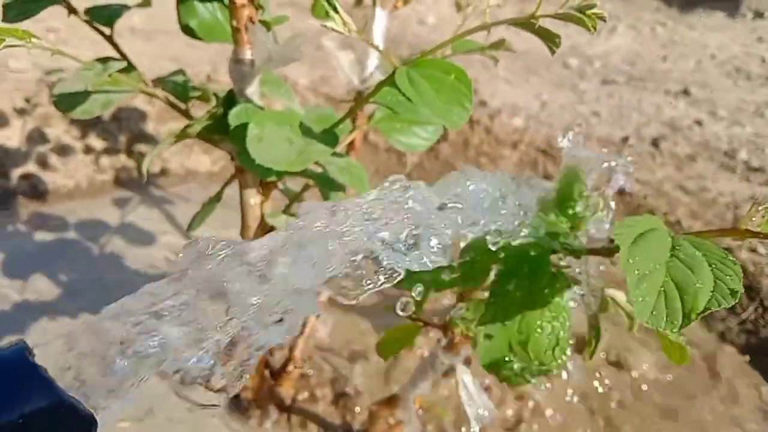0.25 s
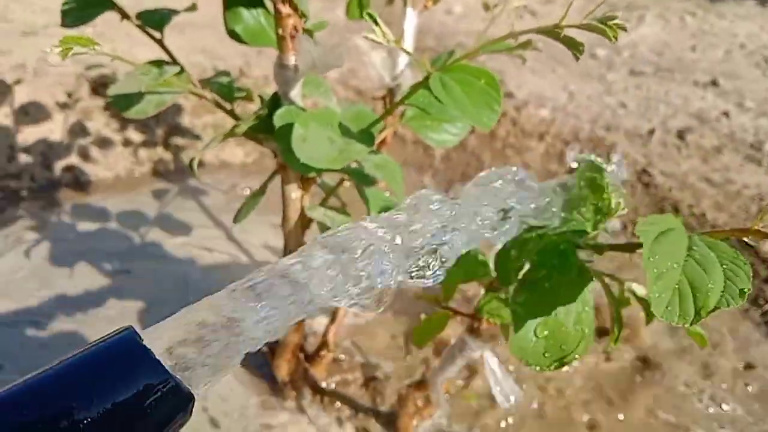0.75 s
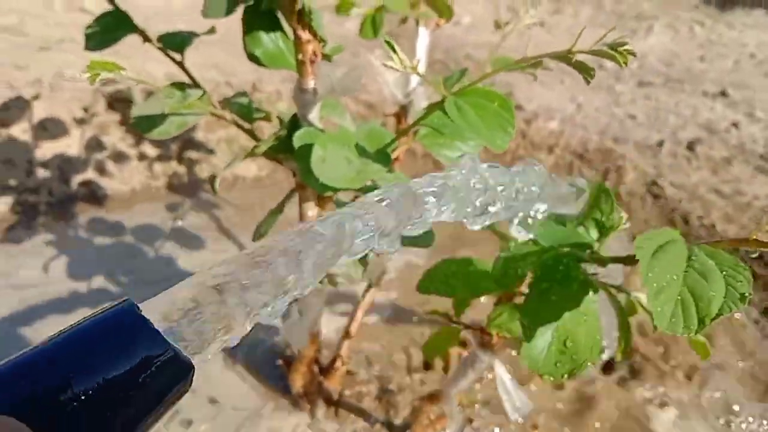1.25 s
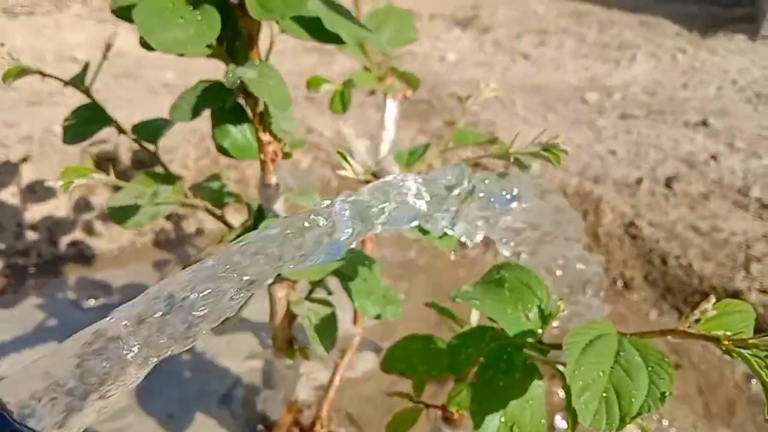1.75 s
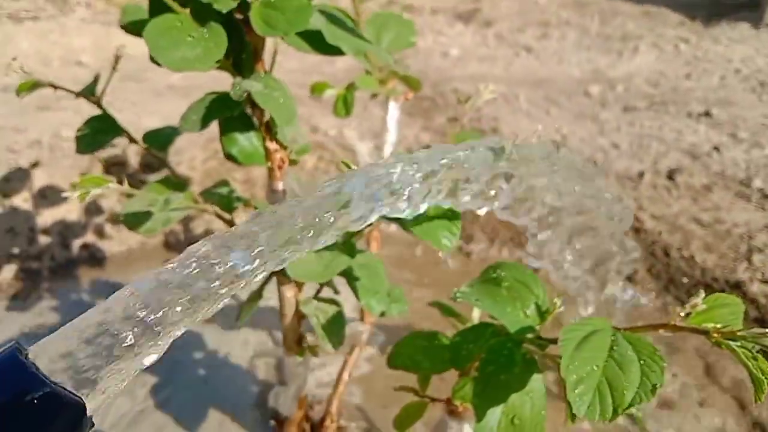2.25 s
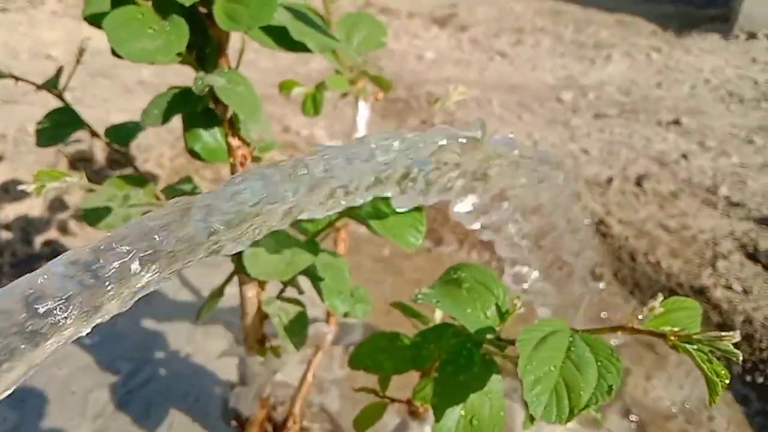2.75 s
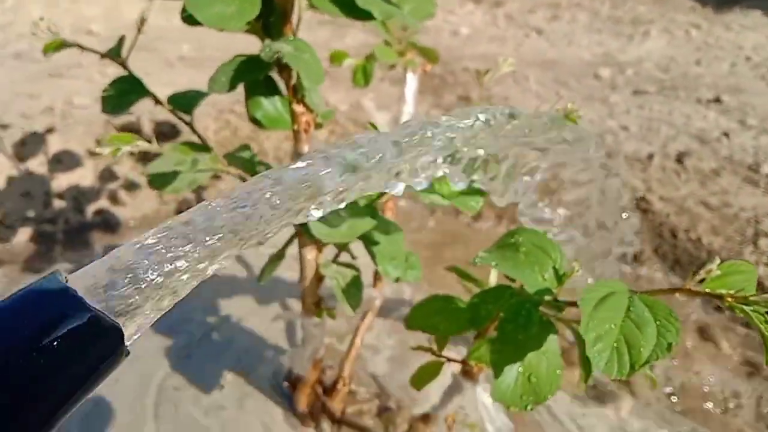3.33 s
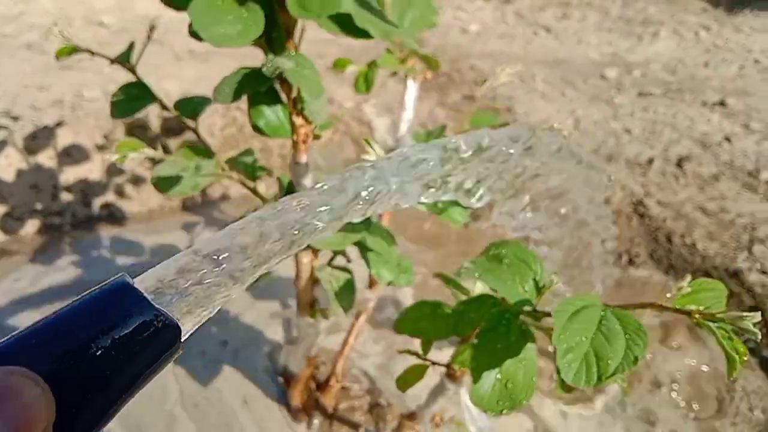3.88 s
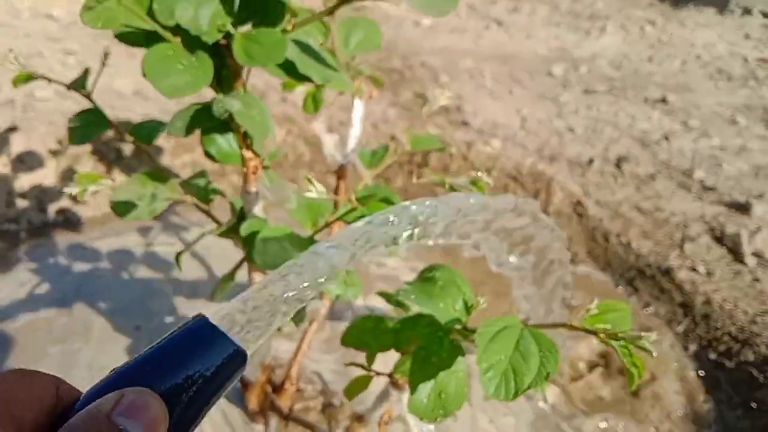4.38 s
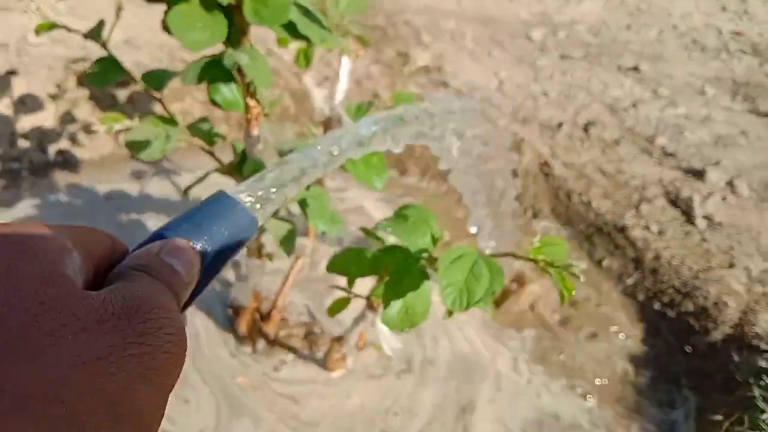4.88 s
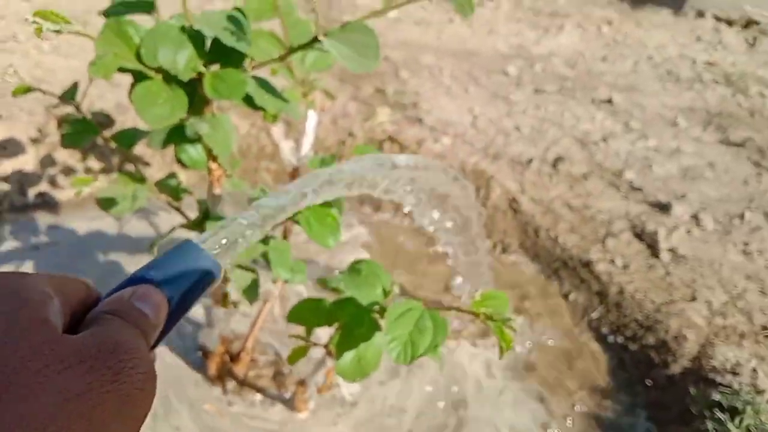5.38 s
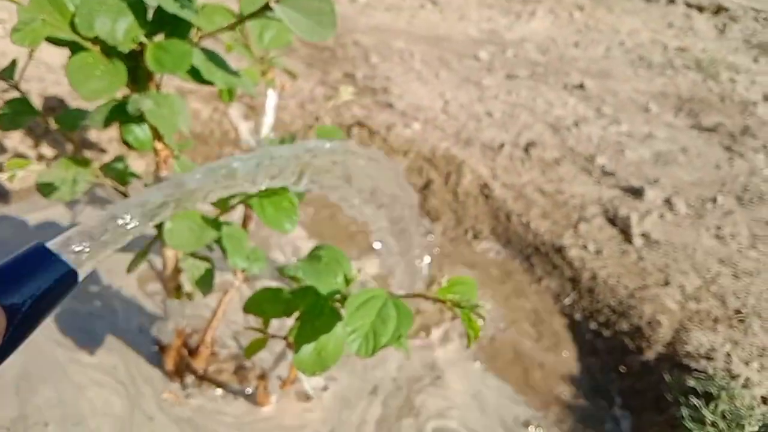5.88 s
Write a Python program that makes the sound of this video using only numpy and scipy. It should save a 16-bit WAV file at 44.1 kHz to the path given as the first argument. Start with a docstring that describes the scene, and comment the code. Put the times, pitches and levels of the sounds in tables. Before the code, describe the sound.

Very close outdoors, a heavy hose jet batters sapling leaves with bright, crackling splatter for about a second and a half. It then drops somewhat quieter and deeper into a muddy puddle, gurgling continuously, with sharp wet slaps, low thumps and rising bubble blips. Near the end the jet is drawn back and the low gurgle eases slightly. No echoing space, only water.

```python
"""First a thick jet of water tears noisily on the leaves of a sapling, outdoors and very close.
The jet from a hand-held hose then arcs over them into a muddy puddle, and at last is drawn back a little.
A dense splatter of drop ticks and tiny bubble rings runs throughout.
Lumps of water slap down as clusters of clicks and thump the mud with short low rings.
They trap bubbles, each a ring that swells, dies away and rises in pitch."""
import sys
import numpy as np
from scipy import signal
from scipy.fft import rfft, irfft
from scipy.io import wavfile
from scipy.ndimage import uniform_filter1d, minimum_filter1d, map_coordinates

SR = 44100
rng = np.random.default_rng(int(sys.argv[2]) if len(sys.argv) > 2 else 0)


def file_out(sig):
    """Save sig as 16-bit WAV at sys.argv[1]."""
    # one column per channel
    cols = np.atleast_2d(sig).T
    # limit, then scale
    lim = np.clip(cols, -1, 1)
    pcm = np.round(lim * 32767).astype(np.int16)
    wavfile.write(sys.argv[1], SR, pcm)


N = 269451


def gain_of(db):
    """Turns decibels into a multiplier."""
    return 10 ** (np.asarray(db) / 20)


def evened(x):
    """Scales a sound to an average strength (rms) of 1."""
    return x / np.sqrt(np.mean(x ** 2) + 1e-20)


def follow(rows, column=1):
    """Joins a table's points with straight lines, giving one value per sample."""
    rows = np.asarray(rows)
    return np.interp(np.arange(N) / SR, rows[:, 0], rows[:, column])


def add(mix, start_s, sound):
    """Mixes a sound in at a given time, or at the very start if that time is negative."""
    part = mix[max(round(start_s * SR), 0):][:len(sound)]
    part += sound[:len(part)]


def band(x, lo_hz, hi_hz, order=2):
    """Keeps the sound between two frequencies, without looking ahead in time."""
    edges_hz = [lo_hz, min(hi_hz, SR / 2 - 1)]
    return signal.sosfilt(signal.butter(order, edges_hz, "band", fs=SR, output="sos"), x)


def below(x, hz):
    """The part of a sound under a frequency, not delayed."""
    return signal.sosfiltfilt(signal.butter(3, hz, fs=SR, output="sos"), x)


def colour(x, points, size=4096):
    """Gives a sound a tone colour without looking ahead, so that clicks keep their sharp front."""
    hz, db = np.transpose(points)
    grid_hz = abs(np.fft.fftfreq(size, 1 / SR))
    log_gain = np.log(gain_of(np.interp(np.log(grid_hz + 1), np.log(hz), db)))
    taps = np.fft.ifft(np.exp(np.conj(signal.hilbert(log_gain)))).real  # minimum phase
    return signal.oaconvolve(x, taps[:size // 2])[:len(x)]


def wander(slow_hz, fast_hz):
    """Random drift of rms 1, mostly between two rates."""
    hz = np.fft.rfftfreq(N, 1 / SR)
    shape = hz / (hz + slow_hz) / np.sqrt(hz + slow_hz) / (1 + (hz / fast_hz) ** 4)
    return evened(irfft(rfft(rng.standard_normal(N)) * shape, N))


def impacts(per_s, spread_db):
    """Random clicks: many small, a few large."""
    size = gain_of(spread_db * np.minimum(rng.exponential(1, N), 4))
    return size * rng.choice([-1, 1], N) * (rng.random(N) < per_s / SR)


def ring(hz, cycles, rise, size=9):
    """A bubble's ring: it swells to full strength over some cycles, then dies as its pitch rises."""
    age = np.arange(int(size * cycles / hz * SR) + 2) * hz / (cycles * SR)  # 1 at the peak
    return age * np.exp(1 - age) * np.sin(2 * np.pi * cycles * age * (1 + rise * age / 2))


def swarm(lo_hz, hi_hz, per_s, spread_db, cycles, rise, clump_db, count=30, size=11):
    """Countless small rings, together flat in spectrum; bubbles of like size are born in clouds."""
    out, pitches = np.zeros(N), np.geomspace(lo_hz, hi_hz, count)
    shares = np.sqrt(pitches) / np.sqrt(pitches).sum()
    places = np.linspace(0, size, count, endpoint=False)
    clouds = [wander(slow_hz=23.2, fast_hz=125) for _ in range(size + 1)]
    for hz, share, place in zip(pitches, shares, places):
        # blend two clouds, so that neighbouring pitches clump alike
        k, turn = int(place), place % 1 * np.pi / 2
        cloud = np.cos(turn) * clouds[k] + np.sin(turn) * clouds[k + 1]
        births = evened(impacts(per_s * share, spread_db) * gain_of(clump_db * cloud))
        out += hz * signal.oaconvolve(births, ring(hz, cycles, rise))[:N]
    return evened(out)


def dips(rows):
    """Smooth bell-shaped changes of level in dB, at every sample."""
    t = np.arange(0, N, 32) / SR
    change_db = sum(db * np.exp(-(2 * (t - s) / length) ** 2) for s, length, db in rows)
    return follow(np.c_[t, change_db])


def arrivals(per_s, level_db, size=120):
    """Loosely paced random events: (start_s, level_db at that moment, three random traits)."""
    times = (np.arange(size) + rng.random(size)) / per_s
    traits = np.clip(rng.standard_normal((size, 3)), -2, 2)
    return [(s, level_db[int(s * SR)], *trait) for s, trait in zip(times, traits) if s * SR < N]


# strength of the splatter over time, before smaller swings: time_s, level_db
FLOW_CURVE = [(0.0, -19.5), (0.35, -21), (0.75, -20.5), (1.15, -19.5), (1.45, -23.5), (1.85, -22.4),
              (2.25, -23.5), (2.62, -22.5), (3.0, -22.5), (3.5, -24.5), (4.2, -22.5), (4.65, -23),
              (5.05, -22.5), (5.45, -24), (5.85, -22.5), (6.11, -23.2)]
# the jet breaks up and the splatter briefly drops away: middle_s, length_s, change_db
JET_BREAKS = [(0.23, 0.071, -4), (1.39, 0.03, -3), (2.03, .07, -2), (2.19, 0.032, -11), (2.27, 0.11, -5.5),
              (2.89, 0.041, -10.5), (3.39, 0.059, -10), (4.59, 0.029, -4.5), (4.89, 0.039, -2.5),
              (5.365, 0.048, -2.5), (5.56, 0.038, -3.5)]


def flow_db():
    """How much water is landing, in dB."""
    return follow(FLOW_CURVE) + dips(JET_BREAKS)


# how deeply the jet plunges, which drives the low water sounds: time_s, depth_db
PLUNGE_CURVE = [(0.0, -8.5), (0.5, -10), (0.95, -7.5), (1.15, -9.5), (1.35, -1.5), (2.0, -3), (2.7, -.5),
                (3.2, 0), (3.9, -2), (4.5, -3), (4.85, -5), (5.3, -6), (6.11, -6)]
# the jet glances off, so the low sounds mostly drop out: middle_s, length_s, change_db
SKIM_MOMENTS = [(0.25, .05, 3), (0.48, 0.075, -7), (0.605, 0.04, -18), (0.675, 0.032, -11),
                (0.895, 0.029, -8), (1.14, 0.17, -9), (1.26, .08, -3), (1.76, 0.048, -14), (3.33, .05, -6),
                (3.42, .04, -10)]


def plunge_db():
    """How deep the water is driven into the puddle, in dB."""
    return follow(PLUNGE_CURVE) + dips(SKIM_MOMENTS)


# a faint low rumble that swells once: time_s, level_db
RUMBLE_SWELL = [(5.48, -72), (5.58, -48), (5.72, -75)]


def rumble():
    """A soft low rumble comes and goes: noise kept to a narrow low band."""
    return evened(band(rng.standard_normal(N), 62, 110)) * gain_of(follow(RUMBLE_SWELL))


# colour of the churning puddle: frequency_hz, level_db (per Hz)
CHURN_COLOUR = [(20, -34), (55, -45), (95, -16), (135, -5.5), (185, 2.5), (270, -3), (380, -12.5),
                (600, -18.5), (1200, -35.5)]
CHURN_DB = -42  # before the depth of plunge is added


def churn(plunges):
    """The plunging jet keeps the puddle rumbling with many soft, low blows."""
    blows = impacts(per_s=800, spread_db=2.5) * plunges
    level_db = CHURN_DB + plunge_db() + 0.28 * dips(JET_BREAKS)
    return evened(colour(blows, CHURN_COLOUR)) * gain_of(level_db)


# chains of bubbles from a closing hollow: start_s, length_s, first_pitch_hz, last_pitch_hz, level_db
GLUG_CHAINS = [(0.436, 0.076, 1260, 1740, -31.5), (2.631, 0.084, 990, 1700, -34),
               (3.395, 0.042, 850, 1410, -35), (3.521, .055, 725, 1460, -30.5), (4.16, .1, 288, 760, -40.5)]
# faint glugs come at random in between, each climbing by somewhat under an octave;
# their level is at full depth of plunge (0 dB)
GLUGS_PER_S, LESSER_GLUG_S, LESSER_GLUG_HZ, GLUG_CLIMB, LESSER_GLUG_DB = 3, .06, 694, 1.74, -36


def glugs(size=12000, count=14):
    """A closing hollow sheds smaller and smaller bubbles, so the gurgle slides upward on the whole."""
    out, lesser = np.zeros(N), []
    for s, depth_db, a, b, _ in arrivals(GLUGS_PER_S, plunge_db() + dips(JET_BREAKS)):
        first_hz = LESSER_GLUG_HZ * np.exp(0.295 * b)
        length = LESSER_GLUG_S * np.exp(0.22 * a)
        lesser.append((s, length, first_hz, first_hz * GLUG_CLIMB, LESSER_GLUG_DB + depth_db))
    for s, length, first_hz, last_hz, db in GLUG_CHAINS + lesser:
        chain = np.zeros(size)
        for part in np.linspace(0, 1, count):
            hz = first_hz * (last_hz / first_hz) ** part * np.exp(.1 * rng.standard_normal())
            start_s = length * (part + rng.uniform(-.5, .5) / count)
            add(chain, start_s, rng.uniform(.5, 1) * ring(hz, cycles=1.7, rise=.015))
        add(out, s, gain_of(db) * chain * np.sqrt(length * SR / np.sum(chain ** 2)))
    return out


# the loudest bubbles, pitch and level trimmed a little below: time_s, pitch_hz, level_db
LOUD_BUBBLES = [(0.113, 2150, -13), (0.337, 1590, -18), (0.513, 1650, -18.5), (0.538, 1670, -18.5),
                (0.706, 1840, -17), (0.784, 2090, -20), (1.287, 1850, -16.5), (1.5, 1910, -20),
                (2.591, 1700, -20), (3.197, 1270, -20), (3.234, 1390, -20.5), (3.567, 1380, -18),
                (3.776, 1300, -22), (3.921, 1680, -19.5), (4.445, 1190, -22), (5.073, 1030, -24.5)]
# stray bubbles: the lower they ring, the deeper they lie and the fainter they are;
# scatter in octaves, level at full depth of plunge (0 dB) and before the same trim
BUBBLES_PER_S, STRAY_HZ, STRAY_SCATTER, STRAY_DB, STRAY_DB_PER_OCTAVE = 3, 1154, .55, -27, 3.5
GURGLE_PER_PLUNGE = 0.61  # dB of gurgle and babble per dB of plunge


def bubbles():
    """Loud bubbles ring near the surface, quickly damped by the foam; many fainter ones babble around them."""
    out, strays = np.zeros(N), []
    for s, depth_db, a, _, _ in arrivals(BUBBLES_PER_S, plunge_db() + dips(JET_BREAKS)):
        octaves = STRAY_SCATTER * a
        strays.append((s, STRAY_HZ * 2 ** octaves, STRAY_DB + depth_db + STRAY_DB_PER_OCTAVE * octaves))
    for s, hz, db in LOUD_BUBBLES + strays:
        cycles = 2.6 * rng.uniform(.8, 1.2)
        # starts early to be strong at the listed time, and a touch low because the pitch rises
        add(out, s - 1.5 * cycles / hz, gain_of(db + 3.7) * ring(hz * .98, cycles, rise=.012))
    babble = swarm(lo_hz=600, hi_hz=3400, per_s=700, spread_db=2.5, cycles=3.5, rise=.025, clump_db=3)
    return out + babble * gain_of(flow_db() + GURGLE_PER_PLUNGE * plunge_db() - 16.0)


# the heaviest lumps punching a hollow in the puddle, levels changed by fixed steps below:
# time_s, boom_db (of the hollow), knock_db (of the impact)
HEAVY_THUMPS = [(0.097, -29, -26.5), (0.173, -59, -25), (0.705, -34, -25), (0.936, -27.5, -28),
                (1.017, -39, -33), (1.055, -33, -25), (1.356, -36, -19.5), (2.014, -28, -22.5),
                (2.489, -33, -31), (2.555, -33, -45), (2.623, -35, -44), (2.709, -32, -28),
                (2.876, -32, -42), (3.033, -40, -24.5), (3.22, -30.5, -26), (3.449, -35, -24),
                (3.61, -30, -21), (3.776, -28, -18), (3.902, -29, -28), (4.304, -60, -20.5),
                (4.465, -49, -24), (4.515, -25.5, -29), (4.551, -34, -24), (4.82, -30, -34),
                (5.053, -33, -24), (5.372, -41, -30), (5.634, -34, -26)]
# lighter thumps in between, at full depth of plunge (0 dB) and before the same steps
THUMPS_PER_S, LESSER_BOOM_DB, LESSER_KNOCK_DB = 3, -38, -31.5


def thumps():
    """A heavy lump knocks on the mud, the hollow that it opens booms briefly, and water slops back in."""
    out = np.zeros(N)
    lesser = [(s, LESSER_BOOM_DB + depth_db + 3.2 * a, LESSER_KNOCK_DB + depth_db + 2.5 * b)
              for s, depth_db, a, b, _ in arrivals(THUMPS_PER_S, plunge_db() + dips(JET_BREAKS))]
    for s, boom_db, knock_db in HEAVY_THUMPS + lesser:
        boom_hz = 178 * np.exp(.13 * rng.standard_normal())
        knock_hz = 720 * np.exp(.18 * rng.standard_normal())
        slop_hz = rng.uniform(280, 900)
        add(out, s - .003, gain_of(boom_db + 1.5) * ring(boom_hz, cycles=0.69, rise=0.026))
        add(out, s - .001, gain_of(knock_db + 7) * ring(knock_hz, cycles=.33, rise=.02))
        add(out, s + rng.uniform(.003, .009), gain_of(knock_db - 5) * ring(slop_hz, cycles=.5, rise=.02))
    return band(out, 166, 2300)


# where the jet is aimed: time_s, place (0 leaves, 1 puddle, 2 drawn back)
JET_AIM = [(1.34, 0), (1.41, 1), (4.45, 1), (4.7, 2)]
# colour of a bursting lump, shared by leaf hits and slaps: frequency_hz, level_db (per Hz)
BURST_COLOUR = [(100, -25.5), (500, -7), (1500, -5), (3200, 5.5), (4000, -0.5), (5000, 3), (6100, 0.5),
                (7000, -4), (8000, -14), (11000, -9.5), (15500, -19.5)]


def leaf_hits():
    """While the jet tears on the leaves, single big drops crack against them as sharp clicks."""
    hits = evened(band(colour(impacts(per_s=60, spread_db=1.8), BURST_COLOUR), 1200, 16000))
    on_leaves = np.maximum(1 - follow(JET_AIM), 0)
    return hits * on_leaves * gain_of(follow(FLOW_CURVE) - 8.5)


# the slaps that stand out, most of them loud: time_s, level_db (over SLAP_S, before TRIM_DB),
# spread_s (in time), pitch_hz (centre of the air pocket's ring)
CLEAR_SLAPS = [(0.288, -13, 0.0016, 6050), (0.336, -16, .001, 4830), (0.434, -9, .0011, 5400),
               (0.542, -9, 0.0031, 4800), (0.783, -18, .0015, 3570), (0.854, -17, 0.0017, 5700),
               (0.933, -13, 0.0025, 5040), (0.966, -14.5, 0.002, 5170), (1.076, -15.5, 0.0013, 2160),
               (1.093, -14, 0.0013, 5700), (1.12, -11, 0.00038, 5860), (1.228, -15.5, .0023, 5060),
               (1.352, -11.5, 0.00035, 5540), (1.42, -16.5, 0.0021, 4930), (1.585, -9.5, 0.00051, 5600),
               (1.704, -14.5, 0.0011, 4460), (1.884, -10, 0.00096, 5630), (1.893, -14, 0.00088, 3580),
               (1.952, -17, 0.00083, 3240), (2.183, -17, 0.00018, 3340), (2.29, -16, 0.00038, 5540),
               (2.314, -17.5, 0.00057, 4930), (2.4, -13, 0.0011, 4800), (2.491, -15.5, 0.0017, 2980),
               (2.605, -16, 0.00082, 5030), (2.66, -21, 0.0022, 5930), (2.735, -17.5, 0.0017, 4480),
               (2.769, -8, .0009, 4650), (2.869, -13.5, 0.0024, 5300), (2.908, -12.5, 0.00026, 4600),
               (2.926, -11, 0.00038, 4380), (3.01, -8.5, .0004, 4570), (3.232, -14.5, 0.0005, 5260),
               (3.313, -6.5, 0.0005, 5830), (3.374, -12, 0.0012, 4660), (3.421, -13, 0.00036, 5400),
               (3.523, -12, .0011, 4870), (3.607, -8, 0.00089, 5250), (3.793, -7, 0.00029, 4800),
               (3.96, -17, 0.0019, 5570), (4.066, -5.5, .0011, 5070), (4.125, -19.5, 0.00079, 5000),
               (4.53, -12, 0.002, 5860), (4.713, -13, 0.00059, 5170), (5.051, -12.5, .001, 5200),
               (5.263, -13, .0001, 5560), (5.384, -17, .0003, 3800), (5.393, -17, .0016, 3100),
               (5.539, -10, 0.00015, 5360), (5.65, -13.5, 0.00084, 5600), (5.777, -14, 0.0021, 3200),
               (5.84, -12, 0.00039, 6240)]
SLAP_S, TRIM_DB = .009, -0.82
# other lumps keep bursting at a loose pace, each a little different; their level is dB above
# the splatter's flow level, before TRIM_DB
SLAPS_PER_S, OTHER_SLAP_DB, OTHER_SPREAD_S, POCKET_HZ, POCKET_SCATTER = 8, 4.5, .0009, 4820, 0.19
# a lump gathers the water ahead of it, so a lull comes before each listed slap
LULL_LEAD_S, LULL_S, LULL_DB = 0.0091, 0.012, -3


def lulls():
    """The splatter thins just before each listed slap (dB)."""
    return dips([(s - LULL_LEAD_S - spread, LULL_S, LULL_DB) for s, _, spread, _ in CLEAR_SLAPS])


def slaps(size=2048, count=9):
    """Each lump bursts in a quick cluster of clicks that ring a pocket of trapped air; spray trails behind."""
    out, t = np.zeros(N), (np.arange(size) - size // 4) / SR
    hz = np.fft.rfftfreq(size, 1 / SR)
    treble = (hz / 7500) ** 4 / (1 + (hz / 7500) ** 4)
    others = [(s, OTHER_SLAP_DB + splatter_db + 0.68 * a, OTHER_SPREAD_S * np.exp(.55 * b),
               POCKET_HZ * np.exp(POCKET_SCATTER * c))
              for s, splatter_db, a, b, c in arrivals(SLAPS_PER_S, flow_db())]
    for s, db, spread, centre_hz in CLEAR_SLAPS + others:
        spray = gain_of(-27) * (t > 0) * np.exp(-abs(t) / .006) * rng.standard_normal(size)
        # clicks tend to be strongest in the middle of the cluster
        times = np.linspace(-1, 1, count) + rng.uniform(-1, 1, count) / count
        places = np.clip(np.searchsorted(t, 2.2 * spread * times), 0, size - 1)
        heights = rng.choice([-1, 1], count) * rng.uniform(0.089, 0.82, count) * gain_of(-11 * times ** 2)
        clicks = spray.copy()
        np.add.at(clicks, places, heights)
        pocket = 1 + gain_of(13.0) / (1 + 2j * (hz - centre_hz) / 700)  # resonance 700 Hz wide
        sharpness = gain_of(4.6 * rng.standard_normal() * treble)  # some crack, some plop
        burst = colour(irfft(rfft(clicks) * pocket * sharpness), BURST_COLOUR)
        add(out, s + t[0] - .0001, gain_of(db) * burst * np.sqrt(SLAP_S * SR / np.sum(burst ** 2)))
    return gain_of(TRIM_DB) * out


# colour of the splash on the leaves: frequency_hz, level_db (per Hz)
LEAF_COLOUR = [(240, -43), (400, -27), (595, -9.5), (1030, -10.5), (1190, -3), (1490, -4.5), (1610, -2.5),
               (2550, -8.5), (3360, -6.5), (4090, -7.5), (5560, -3), (6280, -7), (7910, -21.5),
               (11900, -21.5), (15500, -31)]
# colour of the splash in the puddle: frequency_hz, level_db (per Hz)
PUDDLE_COLOUR = [(240, -43), (400, -16), (928, -5.5), (1080, -12), (1240, -4.5), (1630, -4.5), (1820, -6.5),
                 (2840, -2.5), (4030, -6.5), (4630, -2), (5820, -2), (7910, -23), (10400, -20.5),
                 (14100, -27.5), (15500, -29)]
# colour of the splash from further back: frequency_hz, level_db (per Hz)
BACK_COLOUR = [(240, -30), (400, -27), (527, -11.5), (653, -21), (1030, -6), (1450, -11.5), (1610, -9),
               (1930, -12.5), (3250, -6.5), (4090, -11.5), (5730, -4), (6780, -15), (7910, -26.5),
               (11200, -22.5), (15500, -38)]
GURGLE_DB = -7.5  # at full depth of plunge (0 dB), before the flow level


def splatter(plunges):
    """Drops tick and tiny bubbles ping in clumps, because the jet arrives in lumps; a few drops land close by."""
    ticks = evened(impacts(per_s=7000, spread_db=1.5))
    close_ticks = band(evened(impacts(per_s=35, spread_db=3.3)), 7000, 16000)
    pings = swarm(lo_hz=395, hi_hz=14980, per_s=15000, spread_db=3.5, cycles=1.83, rise=0.026, clump_db=3.0)
    tinkles = swarm(lo_hz=2400, hi_hz=6500, per_s=110, spread_db=2.2, cycles=7, rise=.012, clump_db=0, size=1)
    drops = evened(gain_of(-11.0) * ticks + pings)
    drops += gain_of(-7.5) * close_ticks + gain_of(-14) * tinkles

    # fade from one place's colour to the next as the aim moves
    aim, splash = follow(JET_AIM), np.zeros(N)
    for place, spectrum in enumerate([LEAF_COLOUR, PUDDLE_COLOUR, BACK_COLOUR]):
        splash += np.maximum(1 - abs(aim - place), 0) * evened(colour(drops, spectrum))

    lumps = wander(slow_hz=29.0, fast_hz=186)
    deep, deepest = below(splash, 2200), below(splash, 900)
    fizz = evened((splash - deep) * gain_of(2.05 * lumps)) * gain_of(0.06)
    # the lowest bubble sounds need a lump that plunges deep
    deep = deep - deepest + deepest * plunges * gain_of(dips(SKIM_MOMENTS))
    gurgle = evened(deep * gain_of(2.47 * lumps + 3.1 * wander(slow_hz=2.7, fast_hz=59.6)))
    gurgle *= gain_of(GURGLE_DB + GURGLE_PER_PLUNGE * follow(PLUNGE_CURVE))
    surge_db = 0.97 * wander(slow_hz=3.5, fast_hz=20)
    return (fizz + gurgle) * gain_of(flow_db() + surge_db + lulls())


def ground_echo(x):
    """The wet ground returns the splash a moment later; the path changes as the jet wanders."""
    delay_s = .0007 * np.exp(.2 * wander(slow_hz=.5, fast_hz=2))
    echo = map_coordinates(x, [np.arange(N) - delay_s * SR], order=3)
    return (x + .2 * echo) / np.hypot(1, .2)


def scene():
    """All the water, heard from one spot; the jet alternately plunges in and skims the surface."""
    plunges = evened(gain_of(5.5 * np.tanh(wander(slow_hz=9, fast_hz=35))))
    bed = rumble() + churn(plunges) + leaf_hits() + ground_echo(splatter(plunges))
    return (bed + glugs() + bubbles() + thumps() + slaps())[None]


EDGE_HZ = 15700  # upper limit of the sound


def record(dry):
    """A limiter catches the sharpest peaks and ducks everything for a moment; then the treble is cut off."""
    over_db = np.maximum(20 * np.log10(abs(dry[0]) / .86 + 1e-9), 0)
    recovery = np.arange(N) * 220 / SR  # dB regained since the start
    duck_db = np.maximum.accumulate(over_db + recovery) - recovery
    # widen each duck, then smooth it, so that it begins just before the peak
    duck_db = uniform_filter1d(-minimum_filter1d(-duck_db, size=41), size=41)
    low_pass = signal.firwin(301, EDGE_HZ, window=("kaiser", 9), fs=SR)
    return signal.oaconvolve(dry / gain_of(duck_db), low_pass[None], "same")


dry = scene()
out = record(dry)
file_out(out)
```